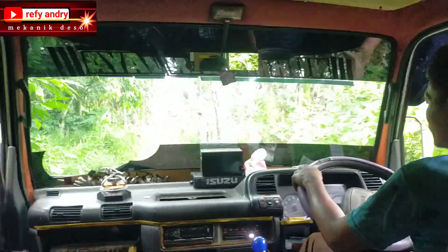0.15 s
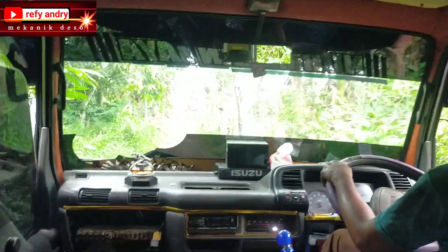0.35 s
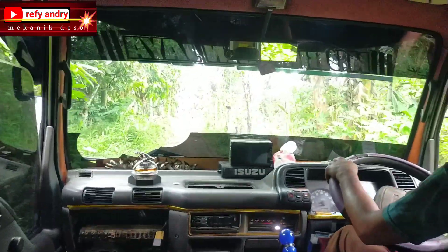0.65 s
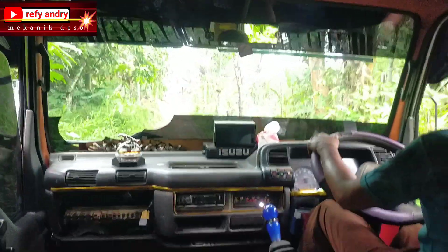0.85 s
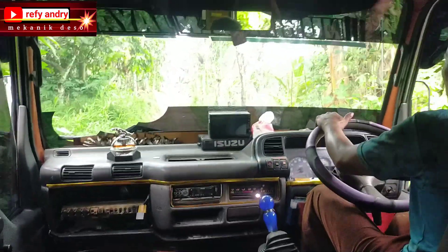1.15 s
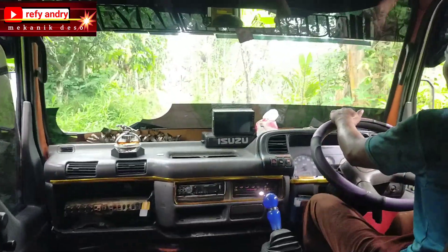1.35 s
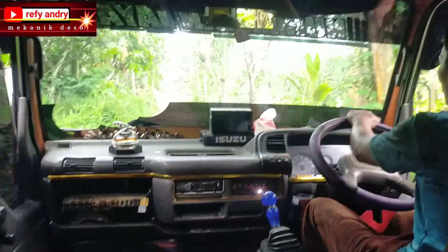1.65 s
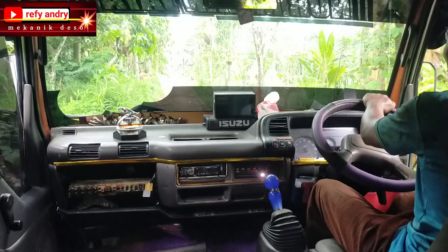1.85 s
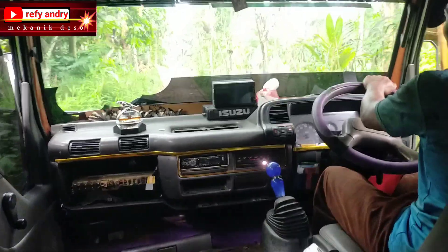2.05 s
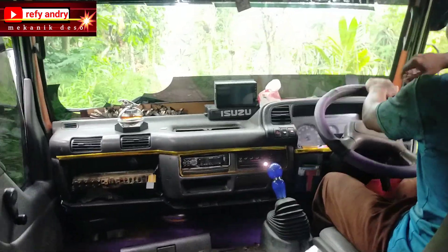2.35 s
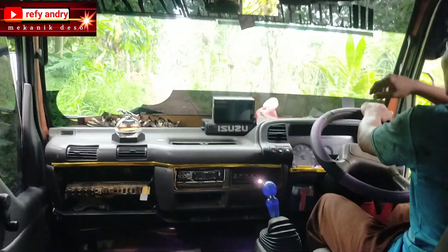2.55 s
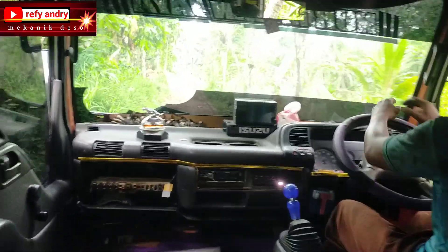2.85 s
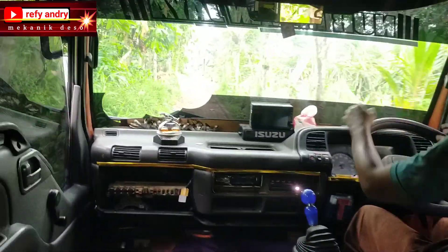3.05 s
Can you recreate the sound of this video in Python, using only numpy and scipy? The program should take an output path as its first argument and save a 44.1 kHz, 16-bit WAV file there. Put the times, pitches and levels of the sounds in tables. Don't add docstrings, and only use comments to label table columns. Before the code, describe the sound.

Truck diesel engine accelerating under load, rough clatter beneath a rising turbo whine and airy hiss

```python
import sys
import numpy as np
from scipy import signal
from scipy.fft import rfft, irfft
from scipy.io import wavfile
from scipy.ndimage import uniform_filter1d

SR = 44100
rng = np.random.default_rng(int(sys.argv[2]) if len(sys.argv) > 2 else 0)


def put_to_file(sound):
    columns = np.atleast_2d(sound).T
    safe = np.clip(columns, -1, 1)
    whole_steps = np.round(safe * 32767)
    wavfile.write(sys.argv[1], SR, whole_steps.astype(np.int16))


def undo_db(level):
    steps = np.asarray(level, float) / 20
    return 10 ** steps


N = 141120


def in_time(rows):
    s, *columns = np.transpose(rows)
    return [np.interp(np.arange(N) / SR, s, c) for c in columns]


def rms_one(x):
    return x / np.sqrt(np.mean(np.abs(x) ** 2))


def coloured(points):
    hz = np.maximum(np.arange(N // 2 + 1) * SR / N, 1)
    at, db = np.transpose(points)
    rolloff_db = -12 * np.log2(np.maximum(hz / at[-1], 1))
    shape_db = np.interp(np.log(hz), np.log(at), db) + rolloff_db
    return rms_one(irfft(rfft(rng.standard_normal(N)) * undo_db(shape_db), N))


def wander(hz):
    settle = 9000
    white = rng.standard_normal(N + settle) + 1j * rng.standard_normal(N + settle)
    lowpass = signal.butter(2, hz, fs=SR, output="sos")
    return rms_one(signal.sosfilt(lowpass, white)[settle:])


def resonance(x, hz, width_hz):
    r = np.exp(-np.pi * width_hz / SR)
    zeros = (1 - r * r) / 2 * np.array([1, 0, -1])
    poles = [1, -2 * r * np.cos(2 * np.pi * hz / SR), r * r]
    return signal.lfilter(zeros, poles, x)


def swept(modes, hz):
    grid = np.arange(0, 17000, .5)
    power = sum(undo_db(2 * db) / (1 + (2 * (grid - at) / width) ** 2) ** 2 for at, width, db in modes)
    return np.sqrt(2 * np.interp(hz, grid, power))


# (frequency [Hz], width [Hz], level [dB])
BLOCK_MODES = [(525, 77, -15), (815, 40, -4.5), (958, 51, -2.5), (1200, 130, -3.5), (1507, 52, -4),
               (1957, 78, -3), (2103, 64, -2), (2571, 27, -3.5), (4610, 260, -10), (5880, 190, -22.5)]
# (frequency [Hz], spectral density [dB per Hz])
ROAR_SPECTRUM = [(25, -9.5), (55, -27), (115, -22.5), (250, -12.5), (420, -4.5), (1600, -2.5), (2400, -6),
                 (5500, -10.5)]


def engine(turns, load_db):
    block_db, spread_db, sharpness = -5, 1.5, 1.6
    mean_depth, fade_per_db = .5, .06
    strength = undo_db(spread_db * rng.standard_normal(200))[turns.astype(int)]
    pulse = strength * np.abs(np.sin(np.pi * turns)) ** (2 * sharpness)
    depth = mean_depth - fade_per_db * (load_db - load_db.mean())
    gate = 1 - depth + depth * pulse / pulse.mean()
    gate = gate / np.sqrt(uniform_filter1d(gate ** 2, size=9000))

    noise = gate * rng.standard_normal(N)
    block = 0
    for k, (hz, width_hz, db) in enumerate(BLOCK_MODES):
        block = block + (-1) ** k * undo_db(db) * resonance(noise, hz, width_hz)
    roar = np.sqrt(gate) * coloured(ROAR_SPECTRUM)
    return undo_db(load_db) * (undo_db(block_db) * rms_one(block) + roar)


# (frequency [Hz], width [Hz], tone level [dB])
EXHAUST_MODES = [(37.8, 4, -49), (41.5, 5, -49), (73.5, 7, -54.5), (143, 14, -59), (170, 12, -51),
                 (230, 60, -55), (265, 30, -57), (345, 60, -54), (510, 30, -48.5), (588, 30, -46),
                 (695, 45, -46), (780, 50, -50), (890, 50, -50), (1230, 120, -50)]


def orders(rate, turns, load_db):
    level_db, swing_db, follow = 1, 2.0, 1.06
    count, knots, thin = 36, 30, 12
    k, rate, turns = np.arange(1, count + 1)[:, None], rate[::thin], turns[::thin]
    at = np.linspace(0, knots - 1, len(rate))
    swing = np.array([np.interp(at, np.arange(knots), row) for row in rng.standard_normal((count, knots))])
    swing[0] /= 2
    swing[11:] += follow * (load_db[::thin] - load_db.mean()) / swing_db
    sines = np.sin(2 * np.pi * (k * turns + rng.random((count, 1))))
    ladder = swept(EXHAUST_MODES, k * rate) * undo_db(swing_db * swing) * sines
    return undo_db(level_db) * signal.resample_poly(ladder.sum(axis=0), thin, 1)[:N]


# (frequency [Hz], width [Hz], tone level [dB])
DUCT_LOW_MODES = [(3114, 51, -23.3), (3139, 23, -23.0), (3185, 30, -28.2), (3205, 26, -36.5),
                  (3245, 42, -28.4), (3382, 27, -37.9), (3452, 20, -30.3), (3472, 56, -36.3),
                  (3590, 84, -38.1), (3637, 23, -31.7), (3673, 28, -25.4), (3701, 96, -33.8),
                  (3818, 23, -38.5), (3923, 106, -40.5), (4049, 104, -39.3)]
DUCT_MID_MODES = [(6230, 300, -37.7), (6328, 107, -25.4), (6486, 82, -31.1), (6661, 67, -33.5),
                  (6827, 101, -35.6), (7004, 71, -35.8), (7124, 51, -31.7), (7346, 34, -34.4),
                  (7452, 74, -18.8), (7517, 83, -16.2), (7680, 58, -26.6), (7786, 129, -23.9),
                  (7937, 221, -14.2), (8090, 47, -18.7), (8190, 42, -26.8)]
DUCT_HIGH_MODES = [(10476, 89, -42.7), (10801, 267, -38.9), (11278, 151, -33.6), (11520, 342, -40.2),
                   (12130, 424, -39.0), (12940, 600, -41.6), (13512, 99, -33.2), (13806, 129, -31.1),
                   (14120, 259, -33.2), (14371, 215, -33.0), (14806, 166, -26.7), (15045, 109, -24.9),
                   (15177, 67, -28.5), (15474, 352, -39.7)]
# (frequency [Hz], width [Hz], tone level [dB])
BULKHEAD_LEAKS = [
    (3950, 350, -41),
    (6950, 900, -41),
    (15600, 400, -39),
]
# (trim [dB], unsteady share [0-1], flutter [Hz], halo level [dB], halo width [Hz])
WHISTLE_OVERTONES = [
    (1, .16, 32, -14, 110),
    (1, .26, 45, -10, 200),
    (1, .3, 50, -12, 200),
    (.5, .35, 60, -9, 250),
]


def whistle(hz, turns):
    notch_hz, notch_width_hz, throb_depth = 3657, 7, .2
    phase = 2 * np.pi * np.cumsum(hz) / SR
    pitches = np.arange(1, 5)[:, None] * hz
    notch = 1 - 1 / (1 + ((pitches - notch_hz) / notch_width_hz) ** 4)
    heights = swept([*DUCT_LOW_MODES, *DUCT_MID_MODES, *DUCT_HIGH_MODES], pitches) * notch
    leaks = swept(BULKHEAD_LEAKS, pitches)
    throb = 1 + throb_depth * np.cos(2 * np.pi * turns)
    out = 0
    for k, (db, share, flutter_hz, halo_db, halo_hz) in enumerate(WHISTLE_OVERTONES):
        steady = np.sqrt(1 - share) * throb
        flutter = np.sqrt(share) * wander(flutter_hz)
        halo = undo_db(halo_db) * wander(halo_hz)
        envelope = heights[k] * (steady + flutter + halo) + leaks[k] * wander(flutter_hz)
        out = out + undo_db(db) * (envelope * np.exp(1j * (k + 1) * phase)).real
    return out


# (time [s], hiss level [dB], swirl level [dB], swirl centre [multiple of whistle pitch])
INTAKE_AIR = [(0, -30, -34.5, 2.02), (.3, -30.5, -33.5, 2.02), (.5, -29, -35, 2.05),
              (.75, -27.5, -33, 2.15), (1.05, -28.5, -37.5, 2.1), (1.4, -27.5, -39, 2.08),
              (1.7, -26, -37.5, 2.1), (1.95, -25.5, -30.5, 2.2), (2.1, -24.5, -32, 2.15),
              (2.3, -24.5, -27.5, 2.12), (2.5, -26, -24.5, 2.1), (2.7, -26, -28, 2.1),
              (2.88, -27, -22.5, 2.06), (3.05, -25.5, -36, 2.06), (3.2, -24, -24, 2.08)]
# (frequency [Hz], spectral density [dB per Hz])
HISS_SPECTRUM = [(2500, -7), (5300, -2), (6300, 2), (8500, -1.5), (9200, -7.5), (10500, -7.5), (12300, -2),
                 (15500, 0.5)]


def intake(hz):
    swirl_width_hz, swirl_cut_hz = 450, 9030
    hiss_db, swirl_db, multiple = in_time(INTAKE_AIR)
    hiss_db = hiss_db + wander(3.4).real
    swirl_db = swirl_db + 1.5 * wander(10).real
    centre = np.exp(2j * np.pi * np.cumsum(multiple * hz) / SR)
    swirl = np.sqrt(2) * (wander(swirl_width_hz) * centre).real
    swirl = signal.sosfilt(signal.butter(8, swirl_cut_hz, fs=SR, output="sos"), swirl)
    return undo_db(hiss_db) * coloured(HISS_SPECTRUM) + undo_db(swirl_db) * swirl


def cab(x):
    t60_s, wet_db, poses = .04, -11, 9
    n = np.arange(int(t60_s * SR))
    place, reflected = np.linspace(0, poses - 1, N), 0
    for k in range(poses):
        echo = rng.standard_normal(len(n)) * undo_db(-60 * n / len(n))
        echo *= undo_db(wet_db) / np.sqrt(np.sum(echo ** 2))
        nearness = np.sqrt(np.clip(1 - np.abs(place - k), 0, 1))
        reflected = reflected + nearness * signal.fftconvolve(x, echo)[:N]
    return (x + reflected) / np.sqrt(1 + undo_db(2 * wet_db))


# (time [s], firing rate [1/s])
FIRING_RATE = [(0, 34.4), (.15, 35.2), (.4, 37.5), (.75, 36.4), (1.05, 37.35), (1.3, 37), (1.65, 39.3),
               (2.05, 38.6), (2.35, 40.2), (2.6, 40.5), (2.85, 41.75), (3, 42.05), (3.2, 42.6)]
# (time [s], level [dB])
ENGINE_LOAD = [(0, -31.5), (.4, -29.5), (.8, -31), (1.3, -30), (1.7, -30), (2.1, -30.5), (2.4, -29),
               (2.8, -28.5), (3.2, -28)]
# (time [s], pitch [Hz])
WHISTLE_PITCH = [(0, 3092), (.07, 3129), (.15, 3144), (.45, 3293), (.57, 3337), (.72, 3378), (.84, 3389),
                 (1.17, 3457), (1.4, 3501), (1.65, 3595), (1.82, 3648), (2.02, 3678), (2.14, 3699),
                 (2.42, 3796), (2.57, 3840), (2.87, 3963), (3.05, 4035), (3.2, 4106)]


def scene():
    (hz,), (rate,), (load_db,) = in_time(WHISTLE_PITCH), in_time(FIRING_RATE), in_time(ENGINE_LOAD)
    turns = np.cumsum(rate) / SR
    noises = cab(engine(turns, load_db) + intake(hz))
    tones = orders(rate, turns, load_db) + whistle(hz, turns)
    return np.tile(noises + tones, (2, 1))


def top_cut(x):
    return signal.sosfilt(signal.butter(12, 16410, fs=SR, output="sos"), x)


def record(dry):
    cutoff_hz = 15730
    passed = np.arange(N // 2 + 1) * SR / N < cutoff_hz
    mix = irfft(rfft(dry, axis=1) * passed, N, axis=1)
    return top_cut(mix)


dry = scene()
out = record(dry)
put_to_file(out)
```